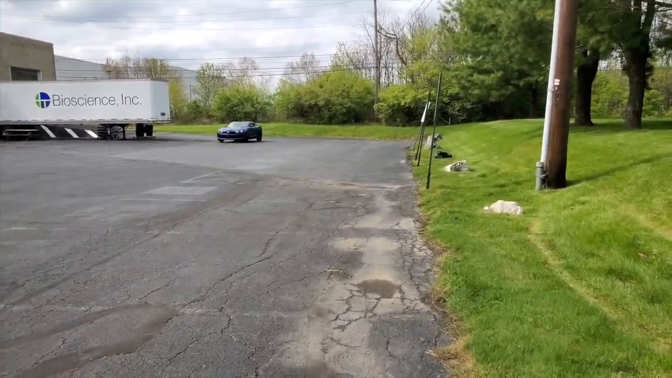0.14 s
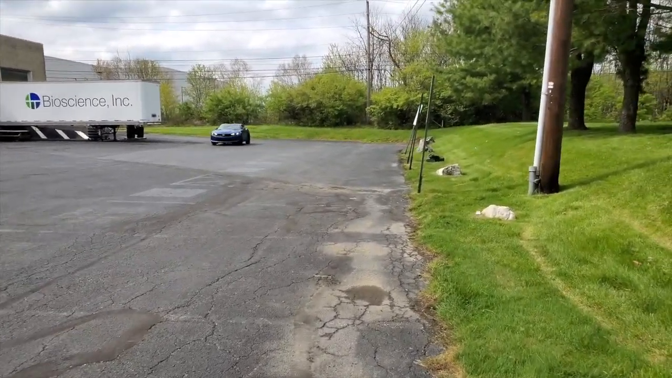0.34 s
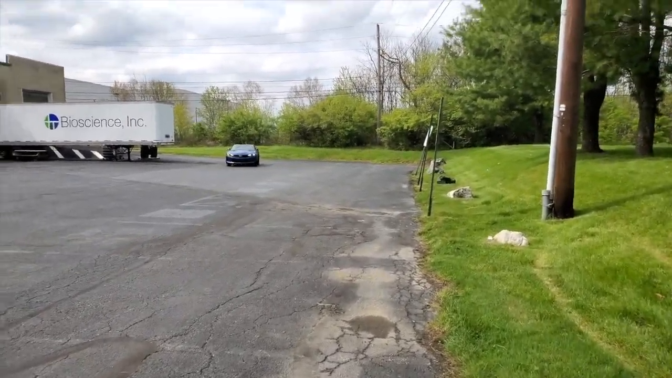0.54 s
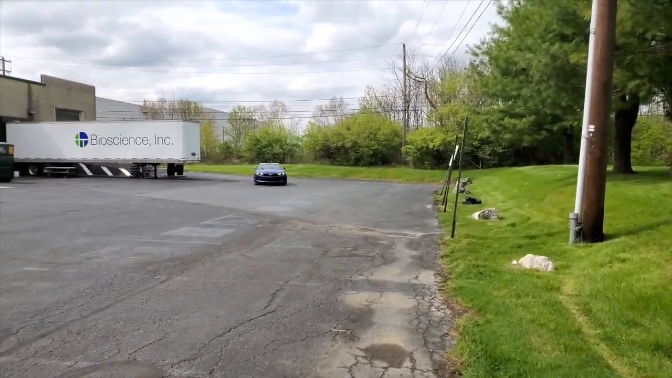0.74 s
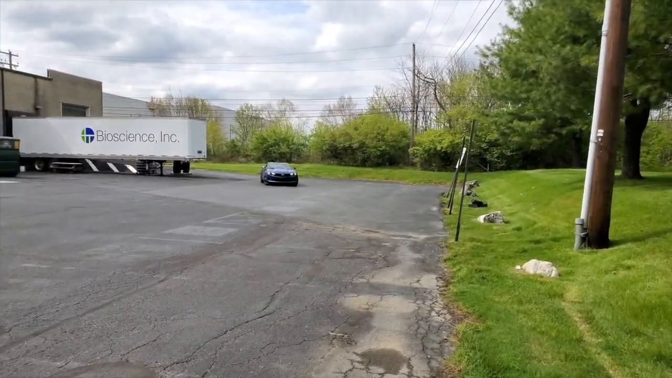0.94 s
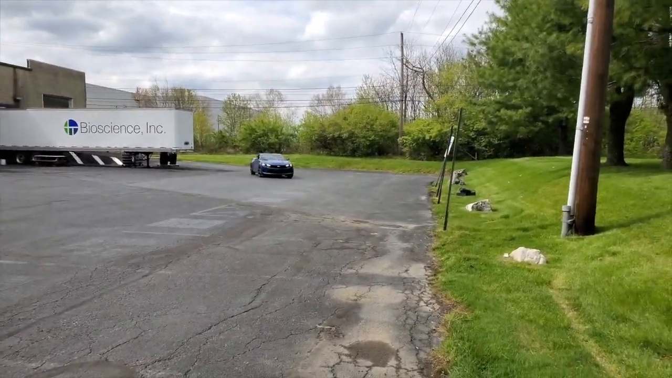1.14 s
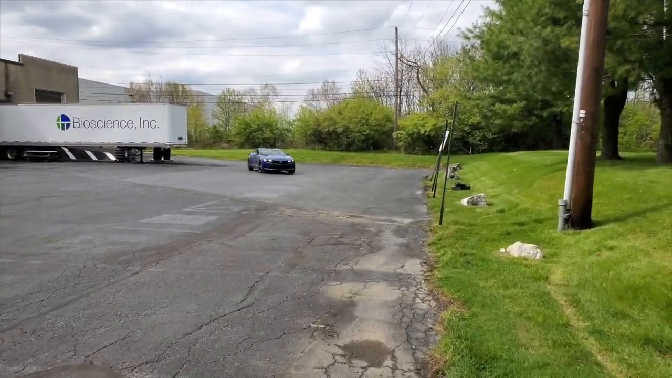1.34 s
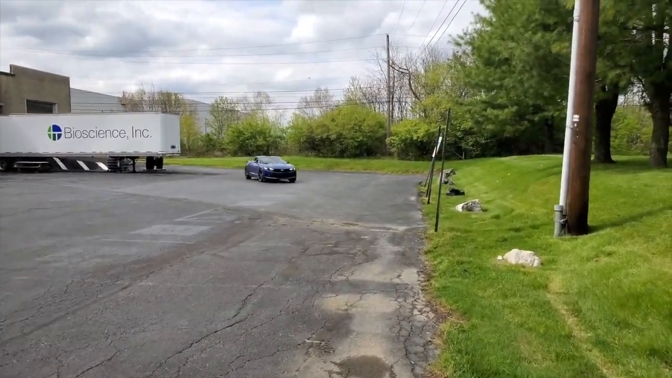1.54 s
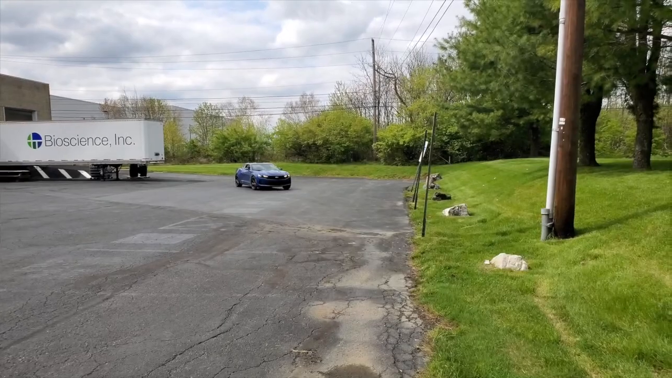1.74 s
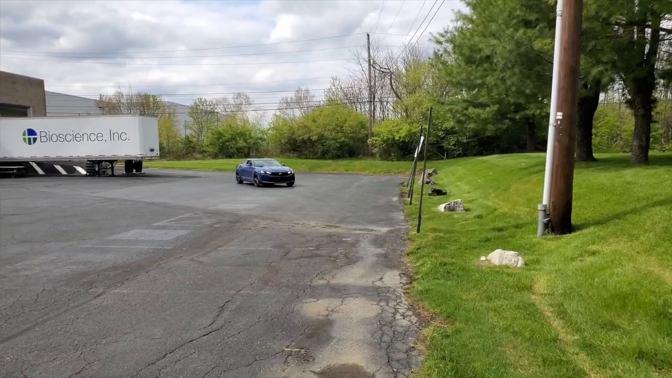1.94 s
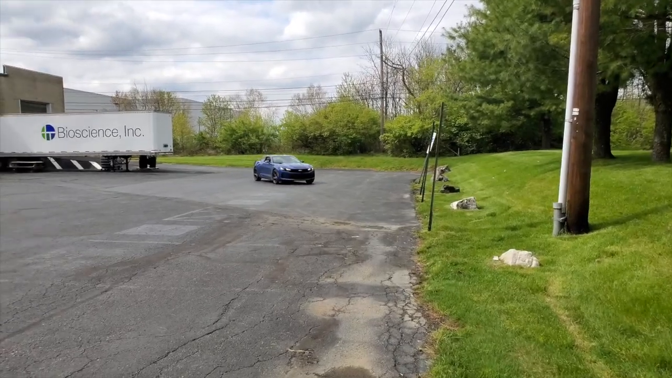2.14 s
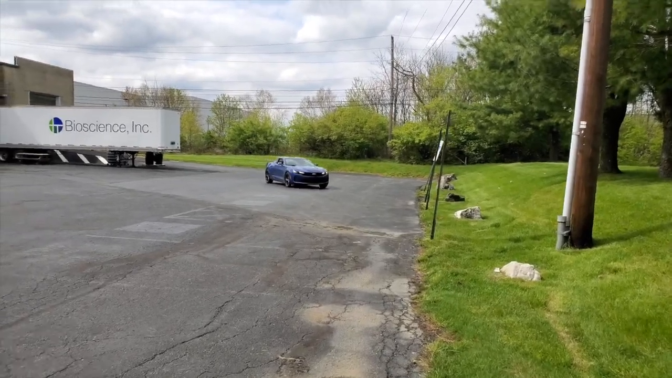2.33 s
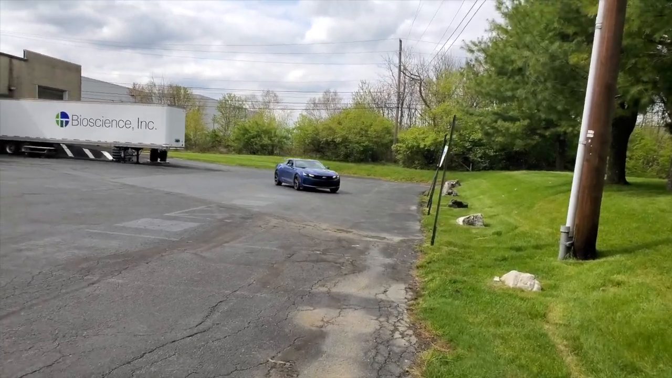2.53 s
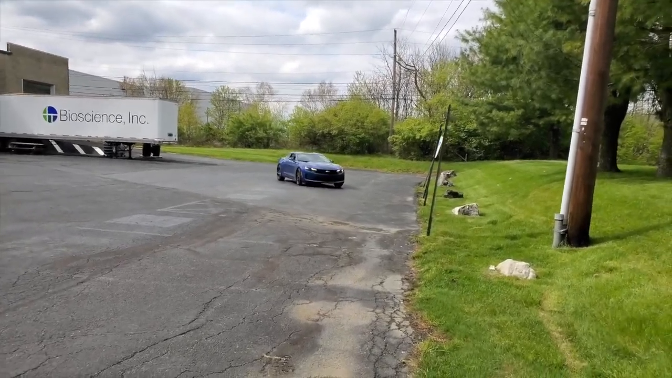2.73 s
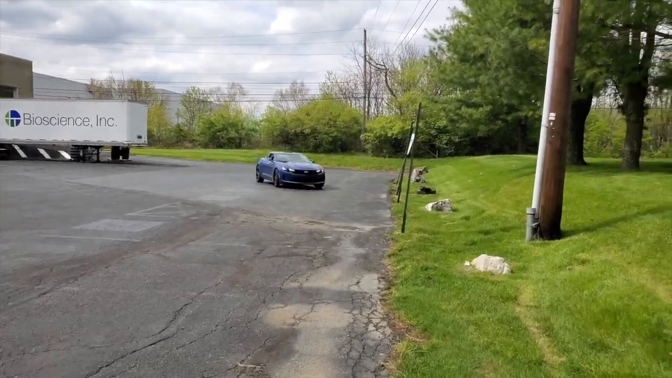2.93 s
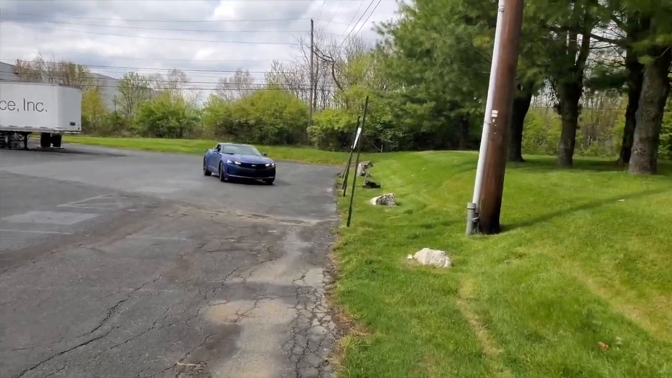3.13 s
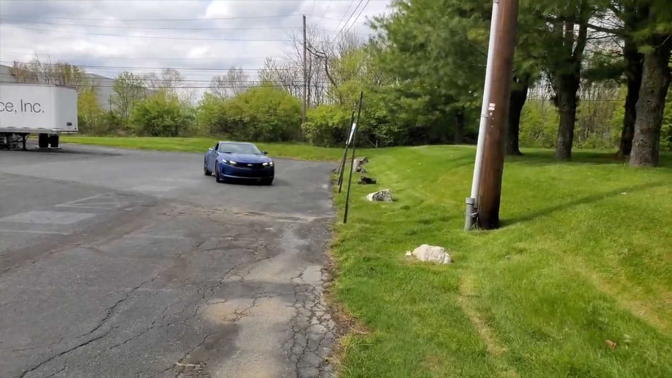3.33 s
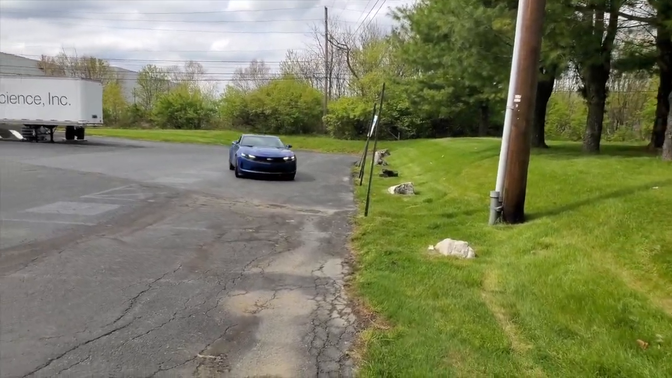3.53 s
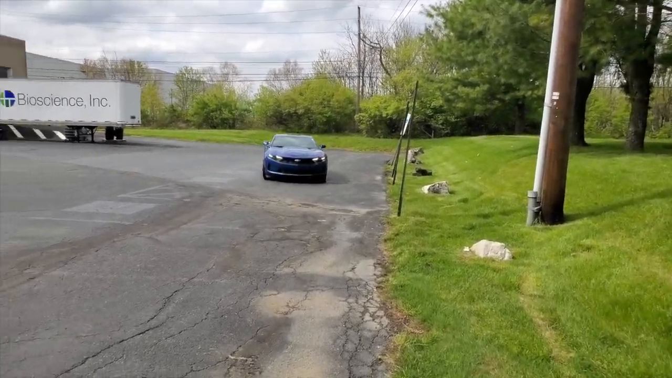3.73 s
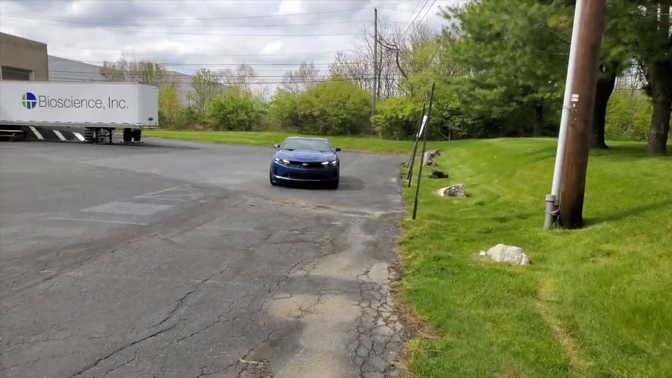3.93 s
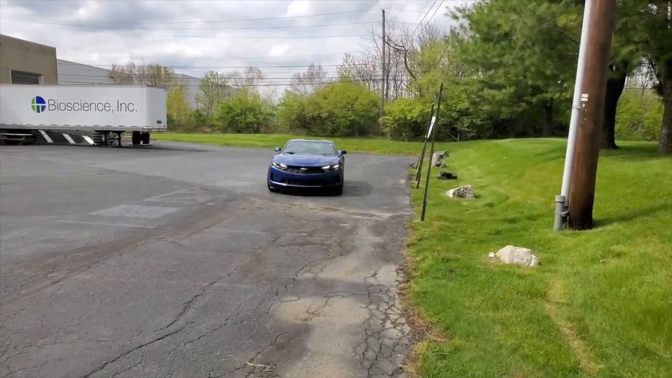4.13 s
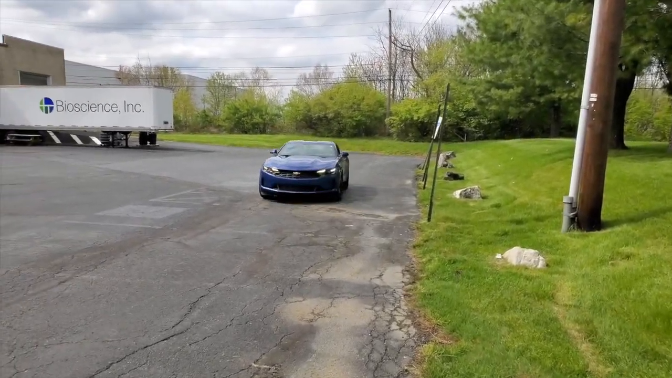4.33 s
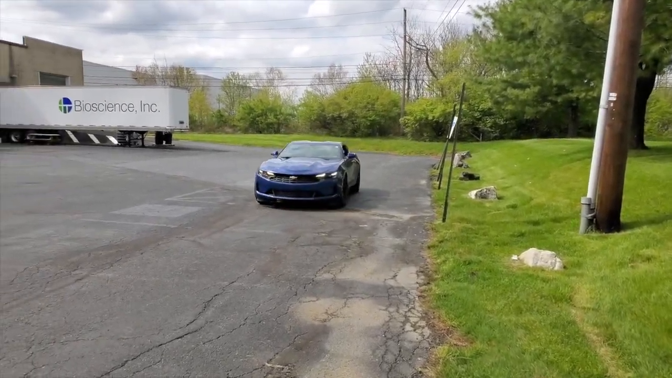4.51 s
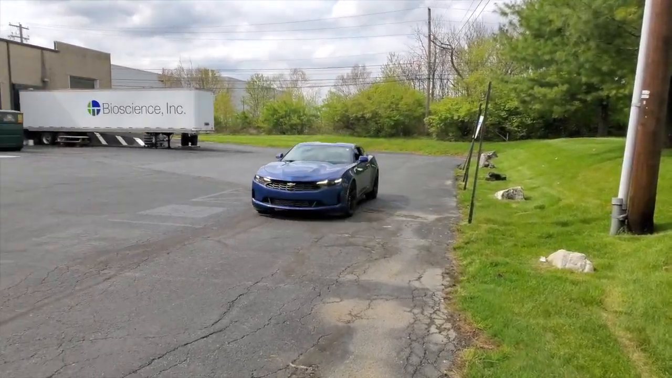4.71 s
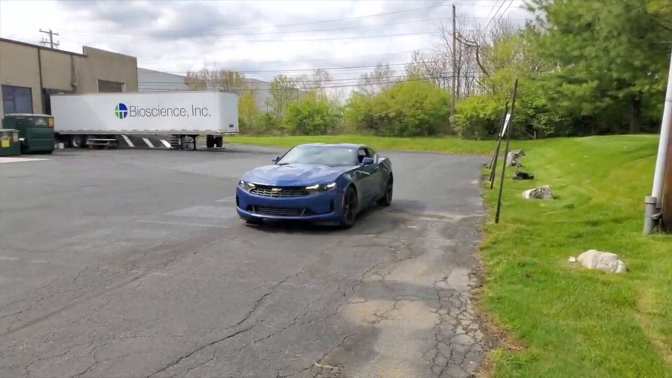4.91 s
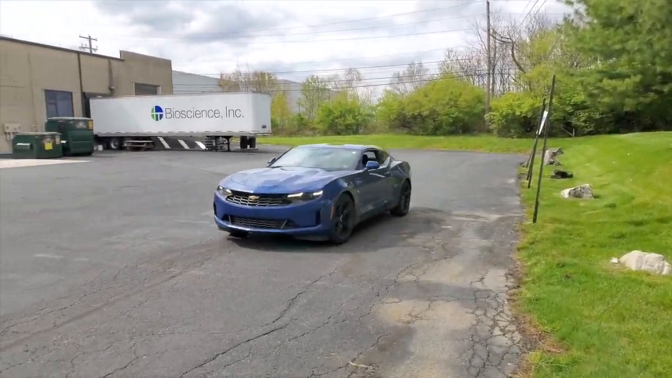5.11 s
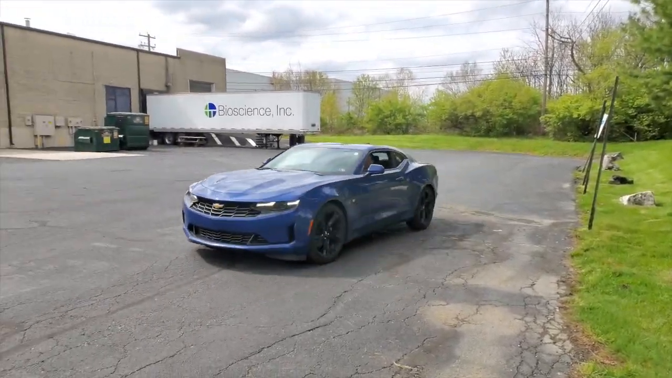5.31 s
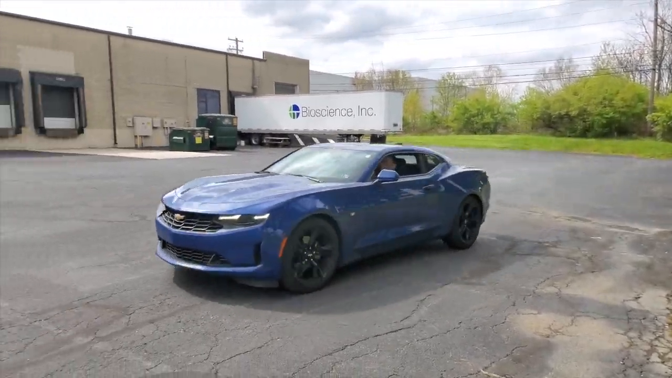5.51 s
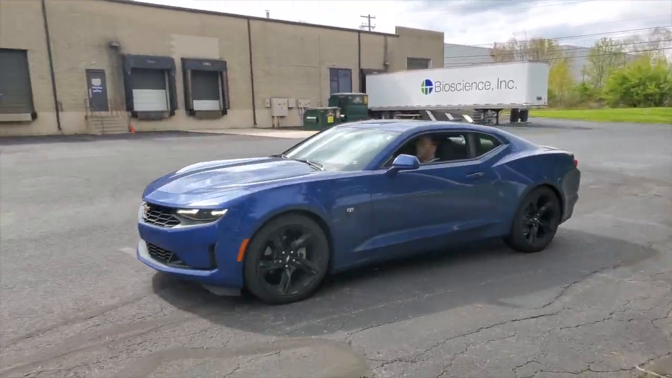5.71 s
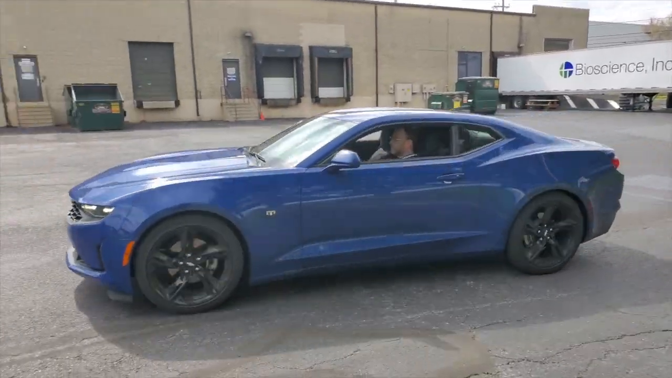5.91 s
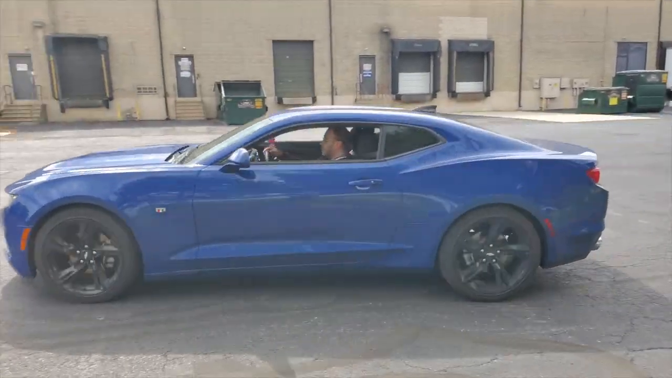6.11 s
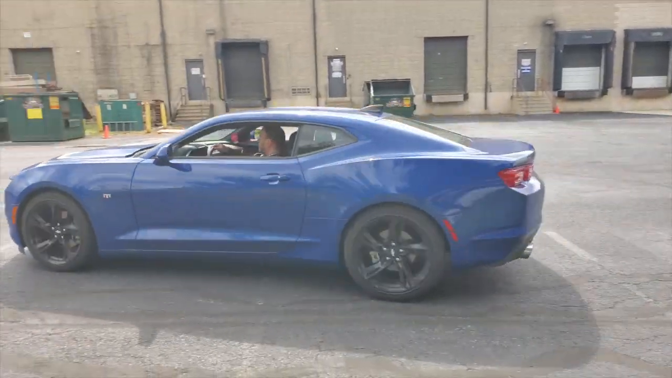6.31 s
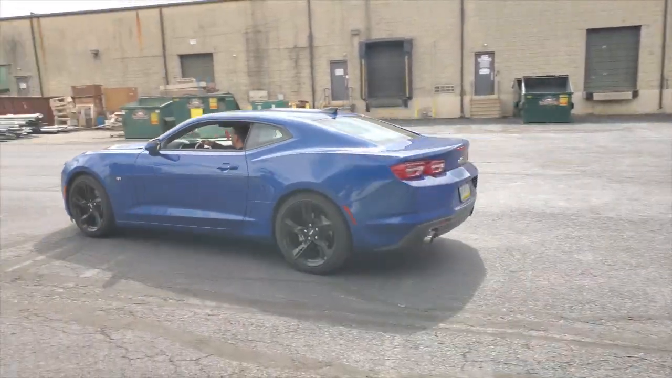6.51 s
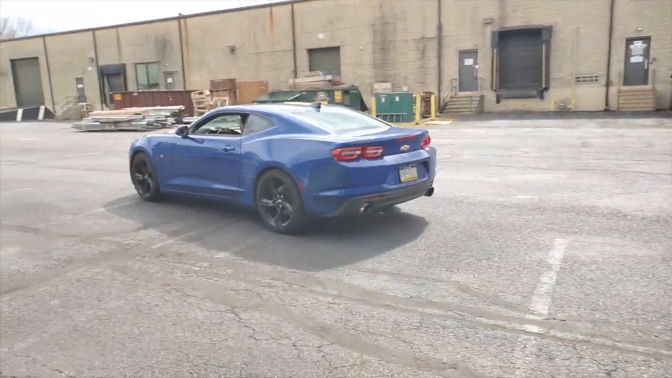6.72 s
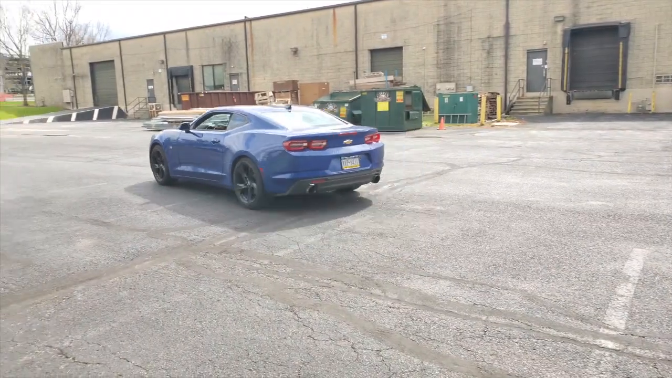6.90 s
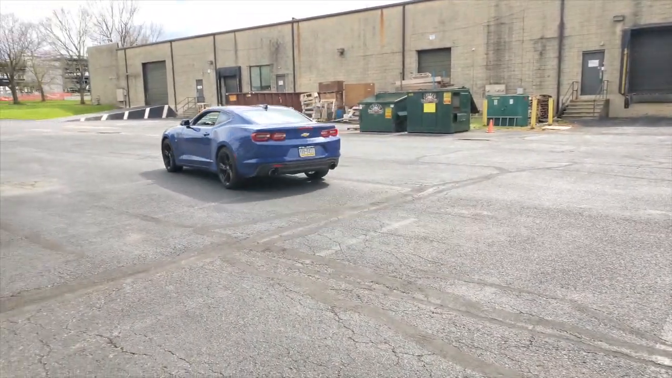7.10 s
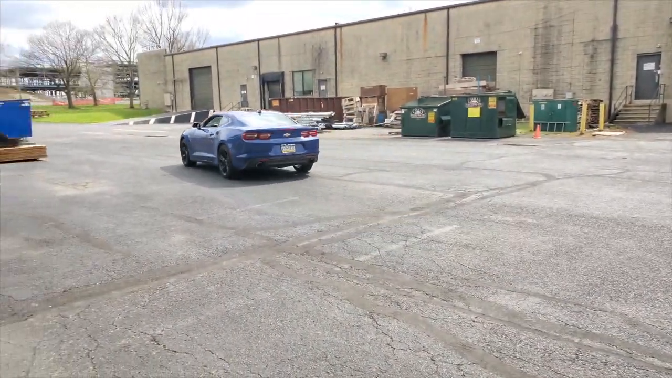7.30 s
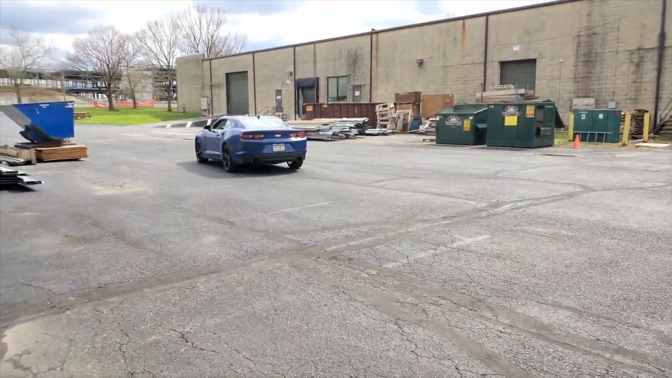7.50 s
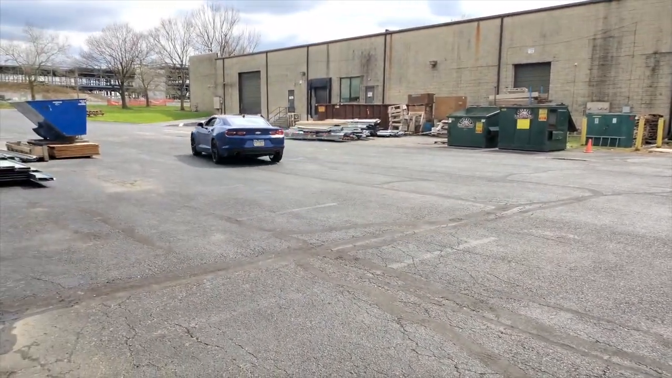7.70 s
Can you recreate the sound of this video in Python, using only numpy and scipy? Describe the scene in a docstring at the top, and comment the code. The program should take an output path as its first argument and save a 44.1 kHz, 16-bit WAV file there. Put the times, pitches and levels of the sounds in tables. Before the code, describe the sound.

A coupe rolls far away with a soft low hum over a light breeze, pebbles snapping now and then and a bird calling early. After easing off, it pulls away with a faint gear whine; the exhaust climbs in pitch, booms close by, rasps through the pass with gritty tyre hiss, then moves off, softening but not silent.

```python
"""Coupe pulling away across a lot

A V6 coupe with a loud exhaust rolls over a paved lot, eases off, then accelerates past and away.
Firing orders are summed cosines; uneven firings ring the silencer and tailpipe; tyre roar is banded noise.
Grit and pinched stones ring briefly, a bird whistles gliding notes, fingers tap the microphone's case.
A gear whine, airy puffs and a low breeze complete the scene."""
import sys
import numpy as np
from scipy import signal
from scipy.io import wavfile
from scipy.ndimage import uniform_filter1d, map_coordinates

SR = 44100
rng = np.random.default_rng(int(sys.argv[2]) if len(sys.argv) > 2 else 0)


def generate_wav(sig):
    """Save sig (samples, or channels by samples) to the path in sys.argv[1] as 16-bit PCM at SR."""
    pcm = np.round(np.clip(np.atleast_2d(sig).T, -1, 1) * 32767).astype(np.int16)
    wavfile.write(sys.argv[1], SR, pcm)


N = 341775
TIME = np.arange(N) / SR

# Tyres and engine bay swell as the car nears.
# Each row: time in seconds, roar level in dB, hiss level in dB, both before the users' trims.
ROAR_LEVELS = [(0, -52, -71.5), (1.45, -48, -64), (2.3, -45, -69), (3.15, -47, -68.5), (3.6, -44, -61.5),
               (4.36, -40, -57), (5.3, -31.5, -48), (5.95, -29, -42), (6.35, -29, -46.5), (7.0, -31, -43.8),
               (7.45, -31.5, -48.5), (7.75, -34, -55)]
# The side of the car that faces the microphone.
# Each row: time in seconds, side (0 far, 1 front, 2 flank, 3 rear), gain above 8500 Hz in dB.
FACING_SIDE = [(0, 1.5, -9), (3.0, 0, -6), (3.9, 1, -6), (4.8, 1, -3), (5.6, 2, 1), (6.2, 2, 3.5),
               (6.7, 3, -4), (7.15, 3.5, -3.5), (7.75, 2.5, -5)]


def from_db(db):
    """Decibels to amplitude ratio: 20 dB is a factor of ten."""
    return 10 ** (np.asarray(db) / 20)


def rms_one(x):
    """Normalise the mean power to 1."""
    return x / np.sqrt(np.mean(x ** 2) + 1e-20)


def in_time(rows, t=TIME):
    """Linear interpolation in time of each column of a curve table."""
    s, *columns = np.transpose(rows)
    return [np.interp(t, s, c) for c in columns]


def at_hz(points, hz):
    """Read a spectrum on a logarithmic frequency axis, as pitch is heard."""
    point_hz, db = np.transpose(points)
    return np.interp(np.log(hz), np.log(point_hz), db)


def drift(rate_hz):
    """Low-passed noise: a smooth random curve of rms 1 that changes about rate_hz times a second."""
    # made at 1/40 of the sample rate, then interpolated
    r = np.exp(-80 * np.pi * rate_hz / SR)
    noise = rng.standard_normal(N // 40 + 2002)
    slow = signal.lfilter([1], [1, -2 * r, r * r], noise)[2000:]
    return np.interp(np.arange(N) / 40, np.arange(len(slow)), rms_one(slow))


def bump(s, width_s):
    """Gaussian bell in time, of height 1 and standard deviation width_s."""
    return np.exp(-.5 * np.minimum(((TIME - s) / width_s) ** 2, 100))


def cut(x, hz, kind, order=2):
    """Butterworth filter: maximally flat in its pass band."""
    sos = signal.butter(order, np.clip(hz, 10, .45 * SR), kind, fs=SR, output="sos")
    return signal.sosfilt(sos, x + 1e-18)


def resonate(x, hz, width_hz):
    """Damped resonator: a pole pair whose radius sets the bandwidth, with gain 1 at the peak."""
    r = np.exp(-np.pi * width_hz / SR)
    zeros = np.array([1, 0, -1]) * (1 - r * r) / 2
    poles = [1, -2 * r * np.cos(2 * np.pi * hz / SR), r * r]
    return signal.lfilter(zeros, poles, x + 1e-18)


def panned(x, pan_db):
    """Level-difference stereo: left minus right is pan_db."""
    return x * from_db(np.array([[.5], [-.5]]) * pan_db)


def delayed(x, lag_s):
    """Propagation delay, constant or varying, by cubic interpolation between samples."""
    return map_coordinates(x, [(TIME - lag_s) * SR], order=3, mode="nearest")


def whistle(rows, waver):
    """Frequency modulation: phase integrates an unsteady pitch; rows give seconds, Hz, dB."""
    hz, db = in_time(rows)
    inside = (TIME > rows[0][0]) & (TIME < rows[-1][0])
    sounding = uniform_filter1d(1.0 * inside, size=300)   # soft edges
    phase_turns = np.cumsum(hz * (1 + waver * drift(90))) / SR
    return sounding * from_db(db) * np.sin(2 * np.pi * phase_turns)


def engine_speed():
    """Rotational inertia: the flywheel smooths the firing rate, in firings per second."""
    # Rolling, easing off, pulling away, levelling out.
    # Each row: time in seconds, firing rate in firings per second before smoothing.
    speed = [(0.0, 50.71), (0.19, 50.02), (1.19, 54.42), (1.64, 60.3), (1.92, 57.31), (2.12, 42),
             (2.35, 38.4), (3.06, 37.7), (3.45, 48.18), (3.85, 71.05), (4.18, 77.24), (4.6, 77.42),
             (4.95, 87.65), (5.35, 90.07), (5.91, 101.06), (6.37, 102.35), (6.86, 101.73), (6.95, 97.77),
             (7.27, 99.71), (7.75, 91.75)]
    return uniform_filter1d(in_time(speed)[0], size=6200)


def rasp():
    """Attack-hold-release envelope, 0 to 1, of the open tailpipes rasping under load."""
    start_s, attack_s, hold_s, release_s = 5.48, 0.46, 0.93, 0.94
    return np.interp(TIME, np.cumsum([start_s, attack_s, hold_s, release_s]), [0, 1, 1, 0])


def exhaust_note(turns, firing_hz, near_flutter_db=1.03, far_flutter_db=2.5, weak_flutter_db=1.5,
                 weak_db=-3.0, wander_turns=0.094, dispersion=0.0637):
    """Fourier synthesis: orders of the firing rate, filtered by pipe resonance and spread by dispersion."""
    # Strength at the microphone, set by throttle and nearness. Each row: time in seconds, level in dB.
    strength = [(0.0, -48), (0.4, -47.5), (1.55, -40), (2.0, -46.83), (2.3, -45), (3.3, -49), (3.6, -30.5),
                (3.87, -26.5), (4.6, -25), (5.05, -12), (5.8, -8), (6.25, -9.5), (7.0, -11.5), (7.5, -15),
                (7.75, -19.5)]
    # The pipes favour some pitches, so an order swells as it climbs. Each row: frequency in Hz, gain in dB.
    pipe_response = [(35.0, -5), (55.0, -9.5), (78.0, 6.5), (100.0, -3.5), (120.0, 2), (155.0, 8.5),
                     (200.0, -1.9), (235.0, -4.5), (290.0, -7.5), (350.0, -13), (440.0, -25.5),
                     (620.0, -56.33)]
    # Unequal cylinder banks give the half orders. Each row: multiple of the firing rate, level in dB,
    # added gain in dB once the car is alongside, added gain in dB in the rasp.
    orders = [(0.5, -18, -9, 9), (1.0, 0.0, 0.5, -0.5), (1.5, -15, -6, 4.5), (2.0, 0.37, -9.5, 7),
              (2.5, -15, -6, -2), (3.0, -4, -5, 13), (3.5, -17.5, -11.5, 25), (4.0, -5.5, -12, 29),
              (4.5, -15.5, 0.5, 21), (5.0, -6, 10, 5), (5.5, -10, 3.5, 21), (6.0, -5, 9.5, 14.4)]
    # As the car moves, a reflection briefly cancels an order, or lifts it if the depth is negative.
    # Each row: time in seconds, multiple of the firing rate, bell width in seconds, depth in dB.
    fades = [(.45, 1.5, 0.18, -14), (1.8, 3, 0.067, 19), (1.98, 2, 0.033, 1), (2.5, 2, 0.042, 18),
             (4.27, 1, 0.089, 6), (4.95, 1, 0.029, 0.5), (5.06, 2, 0.16, 10.5), (5.28, 1, 0.063, 4),
             (5.33, 3, 0.036, 8), (5.59, 1, 0.028, 1), (5.631, 3, 0.039, 11), (5.79, 2, 0.15, 14),
             (5.9, 1, 0.17, -3), (6.3, 1, 0.092, 4), (6.36, 1.5, 0.2, 9.5), (6.82, 2, 0.27, 10),
             (7.06, 3, 0.15, 12), (7.1, 5, 0.24, -7), (7.5, 3, 0.16, -7)]
    strength_db, rasping = in_time(strength)[0], rasp()
    alongside = np.interp(TIME, [4.42, 5.26], [0, 1])   # the body stops screening the tailpipes
    # the faint, distant note is less steady
    flutter_db = np.interp(strength_db, [-40, -27], [far_flutter_db, near_flutter_db])
    out = 0
    for multiple, db, alongside_db, rasp_db in orders:
        strong = multiple in (1, 2, 3)
        level = strength_db + db + at_hz(pipe_response, multiple * firing_hz)
        level += alongside * alongside_db + rasping * rasp_db
        level -= sum(depth * bump(s, width) for s, faded, width, depth in fades if faded == multiple)
        if strong:
            level += flutter_db * drift(3.9)
            wander = 0
        else:   # weak orders flutter faster and do not keep step
            level += weak_db + weak_flutter_db * drift(5.4)
            wander = rng.random() + wander_turns * drift(6)
        # the pipe delays high orders more than low ones, which spreads each pulse
        phase_turns = multiple * turns + wander - dispersion * multiple ** 2
        out = out + from_db(level) * np.sqrt(2) * np.cos(2 * np.pi * phase_turns)
    return out


def burble(turns, rough=0.99, spread_db=-13, far_direct=0.23, near_direct=1.42):
    """Source and filter: uneven firing pulses and gas-flow noise excite silencer and tailpipe modes."""
    # Resonances of the two pipes. Each row: frequency in Hz, width in Hz, gain in dB.
    silencer = [(83, 61, 2.5), (141, 124, -6.5), (203, 62, 4)]
    tailpipe = [(259, 170, -0.5), (318.4, 99, 2), (412.6, 85, -5.5)]
    # Excess strength of each cylinder in firing order, a signed ratio.
    cylinders = [0.9, -0.22, -0.56, 0.12, .5, -0.31]
    # Boom under throttle and bark. Each row: time in seconds, silencer level in dB, tailpipe level in dB.
    levels = [(0, -46.5, -50.5), (1.45, -44, -53.5), (2.3, -48.5, -46.5), (3.35, -49.5, -48),
              (3.83, -39.5, -41), (4.55, -43, -40), (4.9, -31, -38), (5.45, -31, -31.5), (5.9, -34, -24.5),
              (6.4, -38, -23.5), (6.9, -55, -28), (7.75, -67, -35)]
    firings = np.flatnonzero(np.diff(np.floor(turns)))
    count = len(firings)
    sharpness = np.interp(in_time(FACING_SIDE)[0], [0, 3], [far_direct, near_direct])
    out = 0
    for pipe, db in zip((silencer, tailpipe), in_time(levels)):
        pulses = np.zeros(N)
        excess = np.resize(cylinders, count) + rough * rng.standard_normal(count)
        pulses[firings] = excess * np.sqrt(np.gradient(firings))   # equal power at any firing rate
        drive = rng.standard_normal((2, N))
        # from afar the pulses blur into a rumble
        drive[0] = (drive[0] + sharpness * rms_one(pulses)) / np.hypot(1, sharpness)
        ringing = 0
        for k, (hz, width_hz, gain_db) in enumerate(pipe):
            mode = resonate(resonate(drive, hz, width_hz), hz, width_hz)
            ringing = ringing + from_db(gain_db) * mode * (-1) ** k   # neighbours in opposite phase
        direct, scattered = ringing
        spread = from_db(spread_db) * rms_one(scattered) * [[1], [-1]]
        out = out + from_db(db) * (rms_one(direct) + spread)
    return out


def roar(turns, patchy_db=2.02, throb=0.18, peak_octaves=0.086, roar_trim_db=-1.25, hiss_trim_db=-1.0,
         bay_hz=1870, bay_width_hz=110, bay_gain=1.13, jet_hz=7400, jet_width_hz=450, jet_gain=1.0):
    """Band-wise noise synthesis: directivity colours tyre and gas noise, firings modulate it from behind."""
    # Colour of the noise from each side of the car. Each row: frequency in Hz, density in dB per Hz.
    far = [(260, -37), (450, -15), (681, -4.5), (814, -8.5), (1130, 1.5), (1490, -7), (1810, 0),
           (2160, -16.5), (2550, -9.5), (4030, -58), (4400, -19), (5340, -30), (7390, -25), (9230, -38),
           (15500, -28)]
    front = [(260, -32), (450, -22), (522, -9.5), (876, 2), (1110, 2.5), (1580, -10), (1860, 1.5),
             (2130, -7.5), (3970, -24), (4600, -31), (6370, -33.5), (7070, -28), (9370, -44.5),
             (11200, -34.5), (15500, -40.5)]
    flank = [(350, -27), (600, -15.5), (634, -7.5), (716, -5.5), (843, -8), (915, -4), (1810, -4.5),
             (3200, -19.5), (4140, -13), (5080, -26), (5900, -17), (7640, -16), (9120, -32.5),
             (12000, -21.5), (15500, -36)]
    rear = [(380, -7), (650, -11), (918, 4), (1150, 2), (1400, 3), (1710, 3), (2480, -3.5), (2950, -26),
            (4890, -40.5), (5580, -30), (6370, -38.5), (7370, -22.5), (8640, -38), (11100, -28.5),
            (15500, -52)]
    # The road reflection lifts one band and cancels its neighbours (reversed if negative); all climb as
    # the car recedes. Each row: time in seconds, lifted frequency in Hz, depth in dB.
    road_peak = [(6.1, 1580, 1.5), (6.4, 1620, 6.5), (6.65, 1949, 8), (6.9, 2230, 2), (7.3, 2700, -6)]
    # Likeness of left and right. Each row: frequency in Hz, correlation as a ratio.
    likeness = [(450, 0.5), (1000, 0.91), (2000, 0.48), (4000, 0.11), (8000, 0.12)]
    edges = np.geomspace(450, 16000, num=29)
    centres = np.sqrt(edges[1:] * edges[:-1])
    t = TIME[::200]
    view, top_db = in_time(FACING_SIDE, t)
    peak_hz, peak_db = in_time(road_peak, t)
    roar_db, hiss_db = in_time(ROAR_LEVELS, t)

    colour = 0
    for k, side_colour in enumerate((far, front, flank, rear)):
        shown = np.clip(1 - abs(view - k), 0, 1)
        colour = colour + np.outer(at_hz(side_colour, centres), shown)

    def near(hz):
        return np.exp(-.5 * (np.log2(centres[:, None] / hz) / peak_octaves) ** 2)

    comb = near(peak_hz) - near(peak_hz / 2) - near(1.5 * peak_hz)
    colour += peak_db * (t > road_peak[0][0]) * comb
    colour[centres > 8500] += top_db
    gains = from_db(colour) * np.sqrt(np.diff(edges))[:, None]
    low = centres < 3000
    # roar and hiss each keep their own total power
    for part, db in ((low, roar_db + roar_trim_db), (~low, hiss_db + hiss_trim_db)):
        gains[part] *= from_db(db) / np.linalg.norm(gains[part], axis=0)

    white, out = rng.standard_normal((2, 2, N)), 0
    for k, hz in enumerate(centres):
        mid, side = rms_one(cut(white[k % 2], edges[k:k + 2], "band"))
        alike = np.clip(at_hz(likeness, hz), 0, 1)
        side_gain = np.sqrt((1 - alike) / (1 + alike))
        gain = np.interp(TIME, t, gains[k]) * from_db(patchy_db * drift(15.8))
        out = out + gain * (mid + side_gain * side * [[1], [-1]])
    behind = in_time(FACING_SIDE)[0] / 3
    # the engine bay sings towards the front, the exhaust jet towards the rear
    bay = bay_gain * (1 - behind) * resonate(out, bay_hz, bay_width_hz)
    jet = jet_gain * behind * resonate(out, jet_hz, jet_width_hz)
    return (out + bay + jet) * (1 + throb * behind * np.cos(2 * np.pi * turns))


def grit(per_s=220, size_db=8.0, level_db=-7, tilt_db=-9.0):
    """Random impulse process: grains crack under the treads and each rings for a few cycles."""
    sizes = from_db(size_db * np.minimum(rng.exponential(1, N), 5))
    cracks = sizes * rng.choice([-1, 1], N) * (rng.random(N) < per_s / SR)
    pitches = np.geomspace(1400, 11000, num=10)
    dealt = rng.integers(0, len(pitches), N)   # each grain takes one pitch
    rings = 0
    for k, hz in enumerate(pitches):
        ring = panned(resonate(cracks * (dealt == k), hz, hz / 4), rng.normal(0, 4))
        rings = rings + ring * from_db(tilt_db * np.log2(hz / 1400)) / np.sqrt(hz)
    return from_db(in_time(ROAR_LEVELS)[1] + level_db) * rms_one(rings)   # follows the hiss


def breeze(level_db=-56.0, draught_db=-48, corner_hz=50):
    """Turbulent pressure: low-passed noise at the ports, weakest with the car far off, and one buffet."""
    shared, own = rms_one(cut(rng.standard_normal((2, N)), corner_hz, "low", order=3))
    db = np.interp(in_time(FACING_SIDE)[0], [0, 1], [level_db, draught_db])
    db = db + 14.5 * bump(4.83, width_s=.05)   # the soft buffet, in dB
    return from_db(db + 2.7 * drift(3.0)) * (shared + .25 * own * [[1], [-1]])


def stones(attack_per_cycle=2.4):
    """Damped free vibration: a stone pinched by a tyre snaps out and rings as a decaying sine."""
    # Each row: start in seconds, level in dB before attack, decay and a 3 dB lift, frequency in Hz,
    # time to decay by 60 dB in seconds, left minus right in dB.
    pops = [(.176, -53, 6500, .004, -3), (.4575, -43.5, 4200, .005, -9), (0.525, -24, 5500, 0.0007, -9),
            (1.16, -50, 3980, 0.0073, -2), (1.2443, -15, 1840, 0.0068, 2), (1.2695, -36, 2050, 0.0063, 0),
            (1.414, -47, 7200, .004, -8), (2.5714, -38, 3580, 0.0025, 16), (3.3155, -35, 3100, 0.0041, -8),
            (3.5035, -35, 3002, .005, -2), (4.106, -36.5, 7010, .002, -2), (4.884, -33, 9000, 0.0009, -2),
            (5.0317, -7.5, 3140, 0.0016, -8), (5.1383, -29.5, 2800, .008, -4), (5.296, -33, 4500, .001, -4)]
    out = np.zeros((2, N))
    for s, db, hz, t60, pan_db in pops:
        age = np.maximum(TIME - s, 0)
        attack = (1 - np.exp(-attack_per_cycle * hz * age)) ** 2
        decay = from_db(db + 3 - np.minimum(60 * age / t60, 200))
        out += panned(decay * attack * np.sin(2 * np.pi * hz * age), pan_db)
    return out


def lot(x):
    """Discrete reflection: dulled echoes off the walls reach each ear at slightly different times."""
    # Each row: delay in seconds before a small random addition, level in dB before the final mix.
    walls = [(0.045, -14.5), (0.082, -11), (.131, -12), (0.211, -18)]
    out = np.zeros((2, N))
    for ear, side in enumerate(cut(x, 4000, "low")):
        for s, db in walls:
            out[ear] += from_db(db) * delayed(side, s + rng.uniform(0, 0.0019))
    return out


def bird(trill_hz=58, clear_db=-62, trill_range_db=10, fade_db=17):
    """Frequency and amplitude modulation: a note glides as it swells, trilled when soft, clear when loud."""
    # Each row: start in seconds, swell in seconds, swell in dB, fade in seconds, starting frequency in Hz,
    # final frequency in Hz, level in dB at the end of the swell.
    notes = [(.55, .6, 17, 0.04, 4620, 4250, -54), (1.343, 0.031, 10, 0.074, 3420, 3740, -56),
             (1.595, .022, 8, .015, 3680, 3920, -59), (1.772, .018, 6, .015, 3720, 3850, -60)]
    out = 0
    for s, swell_s, swell_db, fade_s, from_hz, to_hz, db in notes:
        u = np.linspace(0, 1, num=6)
        glide_hz = to_hz + (from_hz - to_hz) * (1 - u) ** 2
        rise_db = db - swell_db * (1 - u ** 3)
        note = [*zip(s + u * swell_s, glide_hz, rise_db), (s + swell_s + fade_s, to_hz, db - fade_db)]
        depth = np.clip((clear_db - in_time(note)[1]) / trill_range_db, 0, 1)
        trill = 1 + depth * np.sin(2 * np.pi * trill_hz * TIME + drift(10))
        out = out + whistle(note, waver=0.0071) * trill
    return panned(out, -5)


def puffs(centre_hz=12300, width_hz=2600):
    """Resonance-filtered noise: high, airy hiss swells and dies under Gaussian envelopes."""
    # Each row: centre in seconds, bell width in seconds, level at the centre in dB.
    swells = [(1.77, .025, -63), (1.895, 0.045, -55), (3.47, 0.022, -56.5)]
    hiss = resonate(rng.standard_normal((2, N)), centre_hz, width_hz)
    air = rms_one(cut(hiss, 5000, "high"))
    return air * sum(from_db(db) * bump(s, width) for s, width, db in swells)


def taps(case_hz=1200, case_db=8, thud_hz=450, thud_db=3, rub_db=-26, rub_s=0.0071):
    """Impulse response: a finger's click and brief rub excite two resonances of the case."""
    # Each row: start in seconds, peak in dB before panning, low-pass corner in Hz, left minus right in dB.
    touches = [(2.898, -21.5, 1550, 13), (2.928, -32, 6970, 9), (2.9271, -18, 10900, 19),
               (2.947, -26, 12000, 13)]
    out = np.zeros((2, N))
    for s, db, bright_hz, pan_db in touches:
        click = np.zeros(N)
        click[round(s * SR)] = 1
        rub_decay = (TIME > s) * np.exp(-np.minimum(abs(TIME - s) / rub_s, 20))
        click += from_db(rub_db) * rng.standard_normal(N) * rub_decay
        case = from_db(case_db) * resonate(click, case_hz, 550)
        thud = from_db(thud_db) * resonate(click, thud_hz, 640)
        knock = cut(click + case + thud, bright_hz, "low")
        out += panned(from_db(db) * knock / abs(knock).max(), pan_db)
    return out


def gear_whine():
    """Tonal radiation: the gears give one faint, unsteady tone of rising pitch."""
    # Each row: time in seconds, frequency in Hz, level in dB.
    whine = [(2.9, 502, -76), (3.1, 517, -63), (3.4, 540, -57.5), (3.7, 556, -54), (3.95, 570, -83)]
    return whistle(whine, waver=0.0082)


def scene():
    """Superposition: one engine phase drives note, burble and roar; the tyres stay a little to the right."""
    # Each row: time in seconds, left minus right of the rolling noise in dB, before the treble shading.
    pan = [(0, -2.5), (2.7, -1.5), (3.2, -4.5), (4.9, -4), (5.5, -1.4), (7.75, -2)]
    firing_hz = engine_speed()
    turns = np.cumsum(firing_hz) / SR   # one turn per firing
    exhaust = exhaust_note(turns, firing_hz) + burble(turns)
    rolling = panned(roar(turns) + grit(), in_time(pan)[0])
    treble = cut(rolling, 4000, "high", order=1)
    rolling = rolling - treble + panned(treble, -3.5)   # the case shades the left port from the treble
    left, right = exhaust + rolling + gear_whine()
    # at its closest the car reaches the left ear late, by up to 0.21 ms
    car = np.array([delayed(left, 0.00021 * bump(6.03, width_s=0.45)), right])
    small = stones() + bird()
    return car + small + from_db(-8.0) * lot(small) + taps() + puffs() + breeze()


def record(dry):
    """Band limiting and soft saturation: deepest bass lost, highest peaks rounded, top cut at 15650 Hz."""
    x = cut(dry, 17, "high")
    x = x / (1 + (x / .9) ** 8) ** (1 / 8)
    return signal.sosfilt(signal.ellip(10, .1, 90, 15650, fs=SR, output="sos"), x)


dry = scene()
out = record(dry)
generate_wav(out)
```